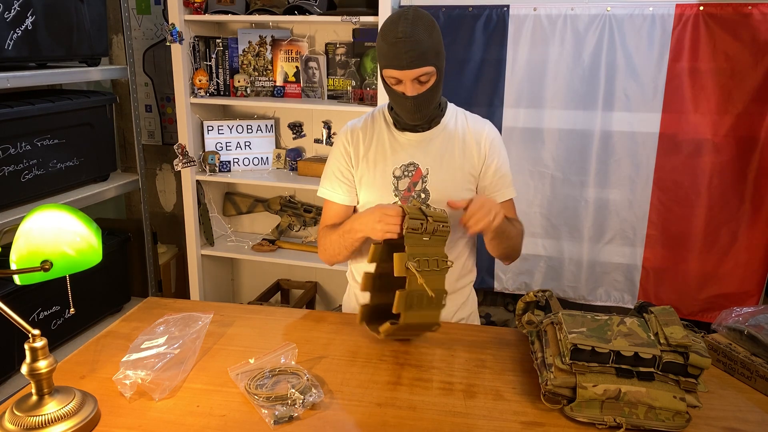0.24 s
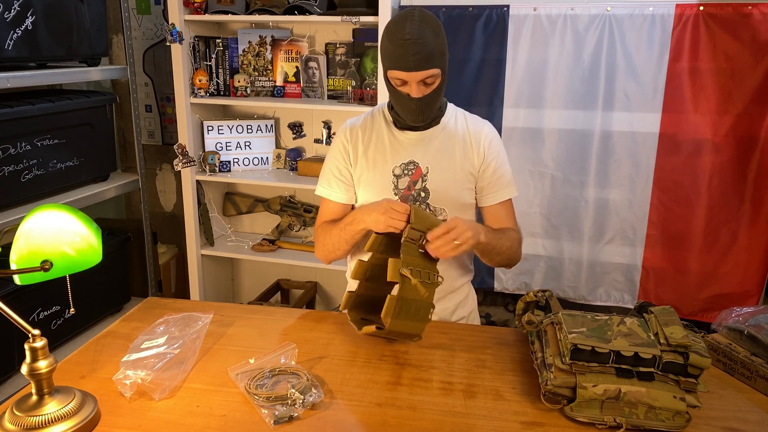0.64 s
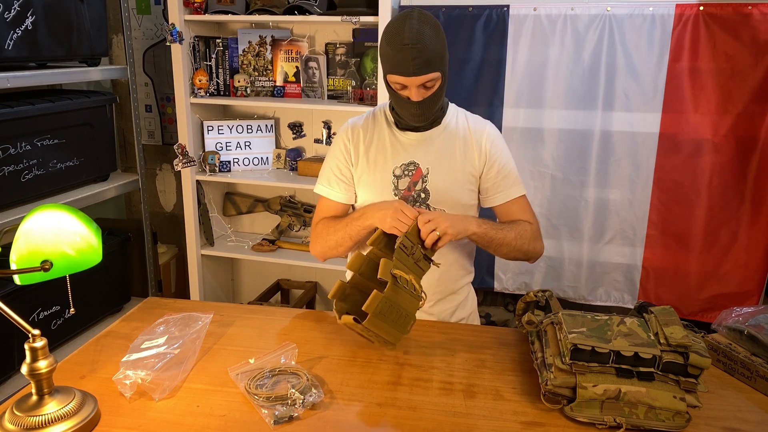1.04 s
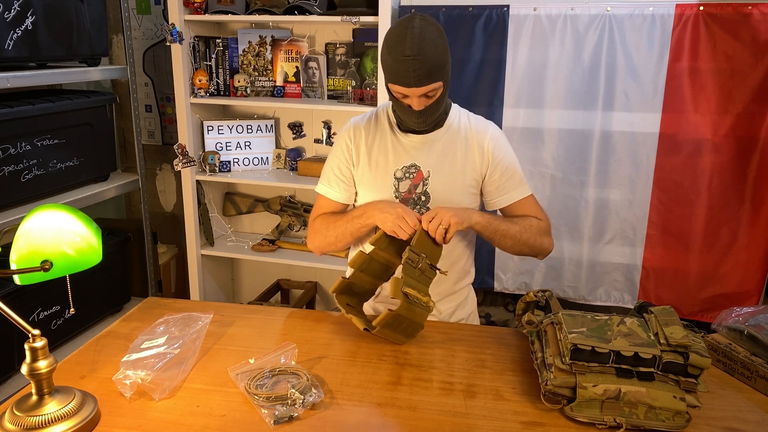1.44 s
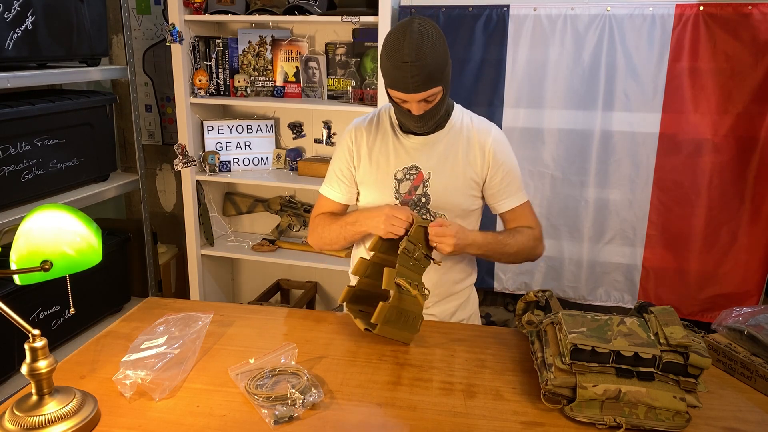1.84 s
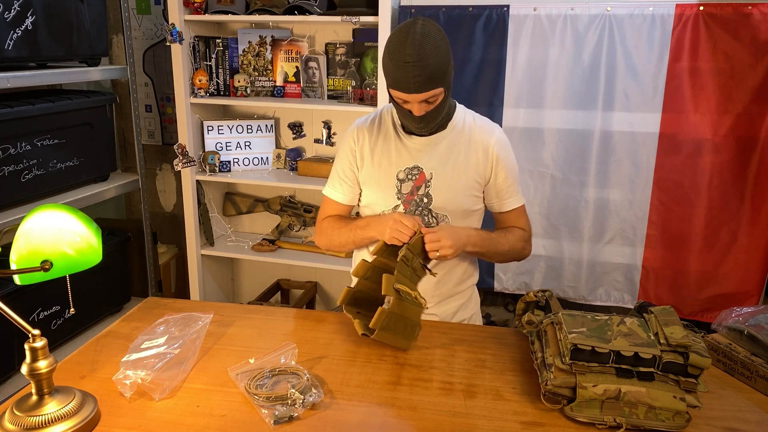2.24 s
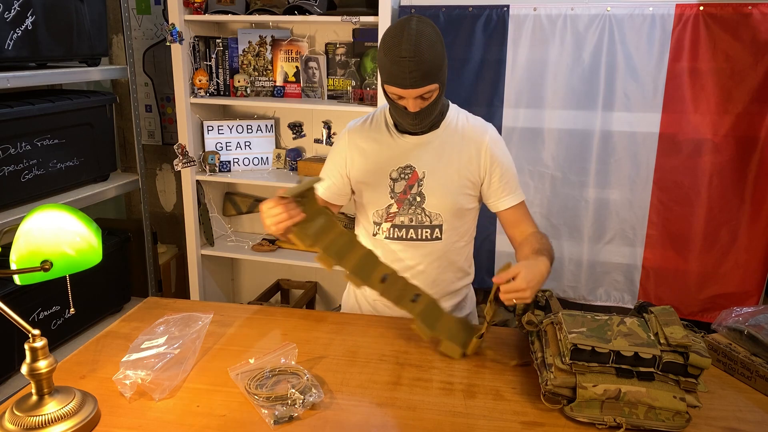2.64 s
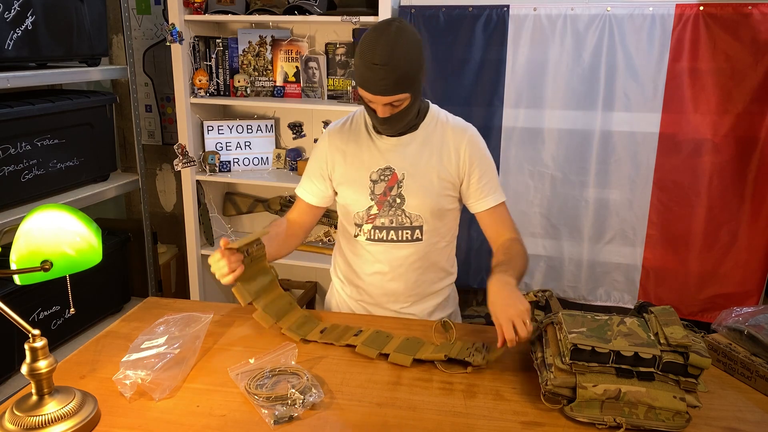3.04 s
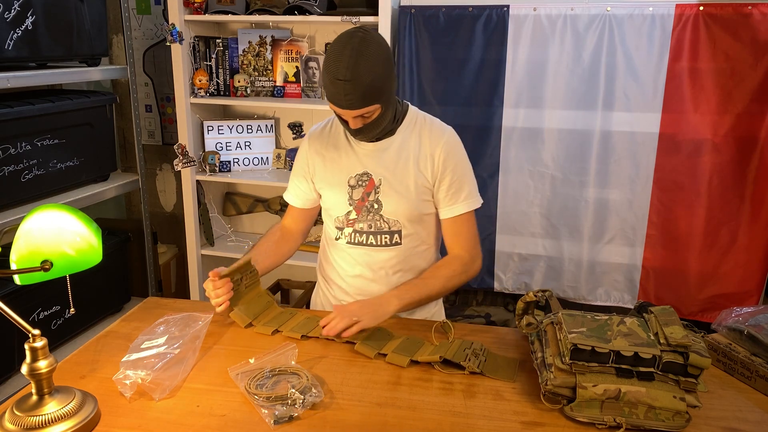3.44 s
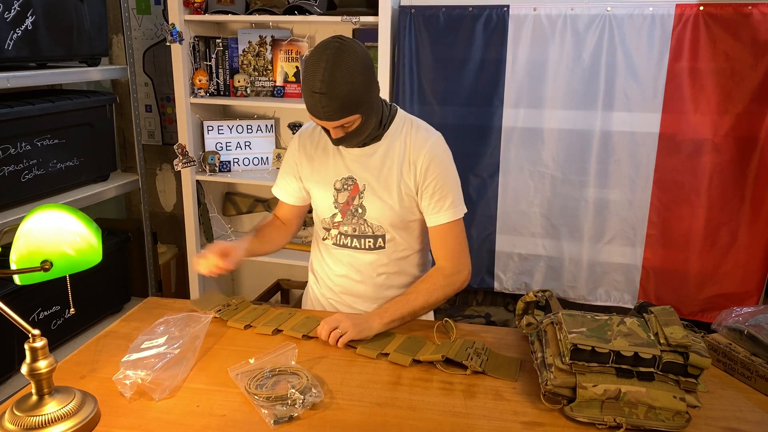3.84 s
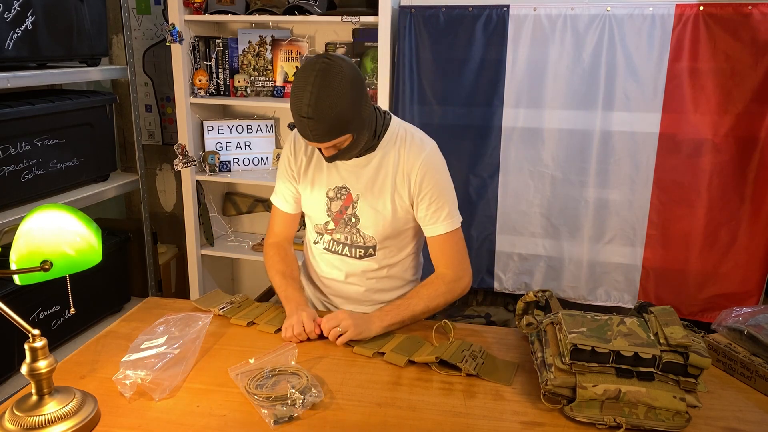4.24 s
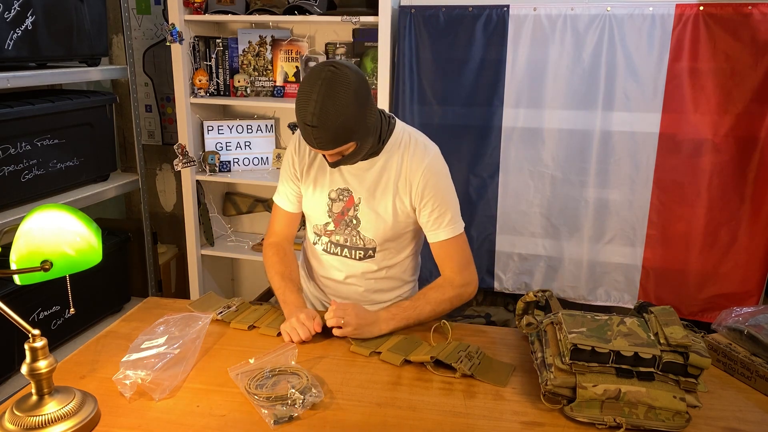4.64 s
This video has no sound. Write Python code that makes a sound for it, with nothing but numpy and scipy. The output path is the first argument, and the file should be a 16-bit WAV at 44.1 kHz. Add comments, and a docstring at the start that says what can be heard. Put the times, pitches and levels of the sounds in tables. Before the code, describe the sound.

Close in a small, fairly dry room, nylon webbing rustles with tiny fibre ticks and faint taps. A crackling hook-and-loop tear builds, and a louder, sharp rip follows within a second. The belt then lands on a wooden table with hollow knocks, one very strong, and low booms. More rubbing and knuckle taps end with a softer, longer rip.

```python
"""Hook-and-loop strips pulled apart

Strips on a nylon belt are ripped apart by hand over a wooden table in a small room. Random clicks stand for
hooks letting go, sparse as a pull starts and dense at full pull, and each click plays a short noise burst.
Between rips, finer clicks make the nylon rustle in the fingers, and fading sine waves make the belt and
knuckles knock on the table. Low noise makes the table top boom; noise echoes make the room."""
import sys
import numpy as np
from scipy import signal
from scipy.fft import rfft, irfft
from scipy.io import wavfile

SR = 44100
rng = np.random.default_rng(int(sys.argv[2]) if len(sys.argv) > 2 else 0)


def wrap_up_sound(samples):
    """Save the sound to the file named by the first command line argument, as 16-bit audio."""
    columns = np.atleast_2d(samples).T
    # keep every value between -1 and 1, then stretch to whole-number steps
    tamed = np.clip(columns, -1, 1)
    steps = np.round(tamed * 32767).astype(np.int16)
    wavfile.write(sys.argv[1], SR, steps)


N = 210529   # length in samples

# Belt and knuckles hitting the table. Each row: start in seconds, blow level in dB before a shared trim,
# pitch in Hz of the hollow under the belt (table modes fade away from it), crack level in dB against the
# blow before a trim, hollow level in dB against the table modes, boom level in dB before a trim.
KNOCKS = [(0.356, -36.5, 400, 3, 9, -70), (0.418, -33.5, 530, 3.5, 1, -51),
          (0.719, -29, 749, -26, 9.5, -51), (0.807, -48, 990, -3, 1, -51), (0.834, -43, 995, -20, 8, -67),
          (1.177, -34, 1990, -7, -2, -58), (2.593, -21.5, 706, -2, -7, -55),
          (2.66, -27.5, 332, 0, -16, -66), (2.928, -36, 790, 0, 4, -38.5),
          (2.956, -27.5, 1310, 3, -13, -52), (3.064, -29, 320, -8, -12, -30),
          (3.084, -17, 406, -3.5, -11, -35), (3.14, -23, 428, -13.5, -1.5, -37.5),
          (3.616, -26, 320, -2.5, -23, -29), (3.677, -1, 894, -2, -3.5, -22),
          (3.85, -27.5, 897, -12, 7.5, -52), (3.925, -27.5, 1856, 12.5, 7, -38),
          (4.019, -8.5, 306, -13, -9, -24), (4.129, -25.5, 316, -5, -6, -55),
          (4.184, -19.5, 905, -38, -1, -22), (4.355, -30.5, 1690, 11.5, 5, -46),
          (4.491, -23, 1696, 12.5, -4, -33), (4.561, -17, 1100, 3, -9, -33), (4.678, -25, 1585, 6, 35, -42)]
# Sound colour of a hook letting go. Each row: frequency in Hz, level in dB per Hz.
HOOK_COLOUR = [(940, -42), (1600, -3.5), (1730, -21), (1960, -19.5), (2130, -2.5), (2480, -15),
               (3090, -2.5), (4490, -1), (5430, -1.5), (6960, -3), (8760, 0), (9820, -7.5), (12500, -8),
               (13500, -5), (15700, -8.5)]


def from_db(db):
    """Turn decibels into a gain."""
    return 10 ** (np.asarray(db) / 20)


def rms_one(x):
    """Scale to an rms of 1 along the last axis."""
    return x / np.sqrt(np.mean(x ** 2, axis=-1, keepdims=True) + 1e-20)


def in_time(rows):
    """Draw straight lines between the rows of a table, giving each column at every sample."""
    start_s, *columns = np.transpose(rows)
    return [np.interp(np.arange(N) / SR, start_s, column) for column in columns]


def hump_db(hz, centre_hz, octaves):
    """A broad rise around a pitch, 6 dB down at the given number of octaves away."""
    return -6.0 * (np.log2(hz / centre_hz) / octaves) ** 2


def coloured(spectrum, shape, lift_db=0):
    """Noise shaped to a spectrum, very weak outside it, with an rms of 1."""
    hz = np.fft.rfftfreq(shape[-1], 1 / SR) + 1   # the 1 avoids log(0)
    table = np.array(spectrum)
    level_db = np.interp(np.log(hz), np.log(table[:, 0]), table[:, 1], left=-90, right=-90)
    noise = rfft(rng.standard_normal(shape))
    return rms_one(irfft(noise * from_db(level_db + lift_db), shape[-1]))


def bursts(spectrum, t60_s, pitches_hz, octaves):
    """Fading noise bursts of energy 1, one per pitch, with the bass under the spectrum filtered out."""
    age = np.arange(2048) / SR
    hz = np.fft.rfftfreq(2048, 1 / SR) + 1
    lift_db = np.maximum(hump_db(hz, np.array(pitches_hz)[:, None], octaves), -14.0)
    shapes = coloured(spectrum, (len(pitches_hz), 2048), lift_db) * from_db(-60 * age / t60_s)
    bass_cut = signal.butter(3, spectrum[1][0], "high", fs=SR, output="sos")
    shapes = signal.sosfilt(bass_cut, shapes)
    return shapes / np.sqrt(np.sum(shapes ** 2, axis=1, keepdims=True))


def shower(per_s, spread_db):
    """Random clicks of uneven size, with an average power near 1 whatever the rate."""
    per_s = np.clip(per_s, 30, SR / 2)
    sizes = from_db(spread_db * np.minimum(rng.exponential(1, N), 4))
    sizes = sizes / np.sqrt(np.mean(sizes ** 2))
    happens = rng.random(N) < per_s / SR
    return sizes * happens * np.sqrt(SR / per_s)


def dealt(clicks, spectrum, t60_s, pitch_hz, low_hz, high_hz, scatter, octaves):
    """Every click plays one of 20 bursts, its pitch scattered in octaves around the pitch of the moment."""
    bank_hz = np.geomspace(low_hz, high_hz, num=20)
    octave = np.log2(pitch_hz) + rng.normal(0, scatter, N)
    choice = np.round(np.interp(octave, np.log2(bank_hz), np.arange(len(bank_hz))))
    length = round(t60_s * SR)
    out = np.zeros(N)
    for k, shape in enumerate(bursts(spectrum, t60_s, bank_hz, octaves)):
        out += signal.oaconvolve(clicks * (choice == k), shape[:length])[:N]
    return out


def drift(rate):
    """Random wandering: straight lines between chance values of spread 1, rate of them per second."""
    knots = rng.standard_normal(int(N / SR * 200) + 2)
    return np.interp(np.arange(N) / SR * rate, np.arange(len(knots)), knots)


def still_air():
    """Steady soft noise of the air, plus a very low, slow pressure sway."""
    # Colour of the air noise, then of the sway. Each row: frequency in Hz, level in dB.
    air_colour = [(59, -39), (100, -3.5), (288, -2), (630, 0), (762, -3), (2150, -7), (11700, -23),
                  (15700, -25)]
    sway_colour = [(1, 0.5), (3, 1), (10, -29), (22, -30.5)]
    return from_db(-62) * coloured(air_colour, (N,)) + from_db(-50) * coloured(sway_colour, (N,))


def boom():
    """Low noise: the table top swells and dies after each knock, over a rumble that never stops."""
    # Rumble under the booms. Each row: time in seconds, level in dB.
    rumble = [(0.0, -62), (0.7, -72.5), (1.9, -57), (2.6, -56.5), (2.9, -63), (4.2, -54), (4.4, -36),
              (4.77, -40.5)]
    # Colour of boom and rumble. Each row: frequency in Hz, level in dB per Hz.
    boom_colour = [(22, -22), (33, -3), (42, 0), (55, -3), (75, -12), (115, -13), (150, -40)]
    rise_s, t60_s = 0.031, 0.42
    t = np.arange(N) / SR
    power = from_db(in_time(rumble)[0]) ** 2
    for start_s, *_, boom_db in KNOCKS:
        age = np.maximum(t - start_s, 0)
        swell = 1 - np.exp(-age / rise_s)
        power = power + (swell * from_db(boom_db + 1.5 - 60 * age / t60_s)) ** 2
    return np.sqrt(power) * coloured(boom_colour, (N,))


def handling():
    """Nylon slides on nylon and skin: fine fibre ticks, bright and dull, whose pitch wanders with the grip."""
    # The course of the grip. Each row: time in seconds, bright rustle level in dB before a trim, its pitch
    # in Hz, dull rub level in dB before a trim, its pitch in Hz.
    grip = [(0.0, -42.5, 5500, -45.5, 750), (0.15, -50.5, 5100, -54.5, 1110),
            (0.238, -54.5, 8000, -71, 1250), (0.29, -51, 8150, -80, 1200), (0.325, -54, 6840, -75, 556),
            (0.366, -47.5, 4210, -52.5, 522), (0.49, -45.5, 4660, -51.5, 980),
            (0.65, -45.5, 6290, -58, 800), (0.8, -46, 5410, -54.5, 1037), (1.02, -46.5, 5160, -52.5, 1068),
            (1.132, -51.5, 5150, -58, 1220), (1.18, -40, 6050, -43.5, 1476),
            (1.326, -49.5, 4830, -49, 1038), (1.5, -43, 7470, -45.5, 1150), (1.59, -52, 4900, -54, 1288),
            (1.94, -48, 5400, -48, 1316), (2.04, -49, 5160, -52.5, 990), (2.18, -42, 5370, -44, 1213),
            (2.47, -41, 5300, -48, 1014), (2.66, -56.5, 4750, -47, 497), (2.79, -44.5, 6060, -49, 892),
            (2.858, -44.5, 4430, -54.5, 1053), (2.905, -54.5, 5400, -59, 803),
            (3.017, -43, 8040, -49, 1070), (3.17, -63, 5600, -46, 470), (3.26, -63.5, 5460, -84.5, 442),
            (3.44, -61.5, 5650, -80, 713), (3.512, -41, 5180, -50.5, 1110), (3.64, -45, 4200, -45.5, 1130),
            (3.78, -49.5, 3740, -41, 379), (3.81, -59.5, 3760, -66, 360), (3.915, -43, 5570, -50, 870),
            (3.99, -59, 5900, -61, 1450), (4.02, -41, 4860, -50, 385), (4.12, -51, 4120, -38, 400),
            (4.19, -46.5, 3880, -34, 603), (4.28, -53, 5750, -51.5, 709), (4.4, -45.5, 5640, -45.5, 1337)]
    # Colours of the bright and the dull ticks. Each row: frequency in Hz, level in dB per Hz.
    rustle_colour = [(880, -61), (1500, -26), (2290, 3.5), (2650, 7.5), (3890, 0.5), (5220, -1.5),
                     (8530, 1), (9980, -4.5), (13500, -2), (15700, -8)]
    rub_colour = [(53, -43), (90, -52), (211, 11), (385, 3.5), (452, 8), (969, -0.5), (1420, 2.5),
                  (1640, 6.5), (3000, -6), (3900, -72.5), (6600, -120)]
    bright_db, bright_hz, dull_db, dull_hz = in_time(grip)
    bright = shower(2300.0, spread_db=0.5) * from_db(bright_db - 3.0 + 2.3 * drift(37))
    dull = shower(1500.0, spread_db=3.0) * from_db(dull_db - 3.5 + 0.7 * drift(34))
    stray = shower(35.0, spread_db=3.5) * from_db(bright_db - 8)   # faint hook snaps at random
    rustle = dealt(bright, rustle_colour, 0.0045, bright_hz, 2200, 14000, scatter=0.37, octaves=1.0)
    stray_snaps = dealt(stray, HOOK_COLOUR, 0.0061, bright_hz, 2500, 12000, scatter=0.69, octaves=1.0)
    rub = dealt(dull, rub_colour, 0.021, dull_hz, 200, 2500, scatter=0.27, octaves=0.62)
    return rustle + stray_snaps + rub


def knocks():
    """Each blow rings the table modes and the hollow under the belt, damped by the hand, plus a crack."""
    # Ringing modes of the table. Each row: frequency in Hz, level in dB, own 60 dB fade time in seconds
    # (held between 0.03 and 0.3 below).
    table_modes = [(123.6, -9.5, 0.23), (192.5, -6.5, 0.3), (291.2, -5.5, 5.0), (387, -6.5, 0.16),
                   (459, -15, 0.5), (621, -10, 0.1), (808, -17.5, 0.38), (894, -7.5, 0.062),
                   (1013, -17, 0.63), (1153, -14, 0.18), (1415, -32, 0.18), (1325, -13.5, 0.074),
                   (1600, -35, 0.68), (1695, -16.5, 0.14), (1710, -41, 0.42), (2027, -17.5, 0.31),
                   (2150, -26, 0.39), (2160, -41, 0.14), (2350, -44, 0.14), (2420, -33, 0.54)]
    # Colour of the crack. Each row: frequency in Hz, level in dB per Hz.
    crack_colour = [(250, -36), (500, 6), (1500, 12.5), (4000, -1.5), (12000, -13)]
    faint_damp_s, full_damp_s = 0.06, 0.15   # the hand damps faint blows faster than full ones
    age = np.arange(SR // 3) / SR
    out = np.zeros(N + len(age))
    hz, level_db, t60_s = np.transpose(table_modes)[:, :, None]
    chance_db = rng.normal(0, 2, (len(KNOCKS), len(table_modes), 1))
    phases = rng.uniform(0, 2 * np.pi, chance_db.shape)
    cracks = bursts(crack_colour, 0.05, np.array(KNOCKS)[:, 2], octaves=8.6)
    contact = 1 - np.exp(-(age / 0.0013) ** 2)   # the soft contact builds up over a few milliseconds
    late = round(.0025 * SR)   # the crack follows the start of contact
    for row, own_db, phase, crack in zip(KNOCKS, chance_db, phases, cracks):
        start_s, peak_db, hollow_hz, crack_db, hollow_db, _ = row
        damp_s = faint_damp_s + (full_damp_s - faint_damp_s) * from_db(peak_db / 2)
        # Higher modes are damped faster by the hand.
        fade_per_s = 1 / np.clip(t60_s, .03, .3) + (hz / 600) ** 0.26 / damp_s
        octaves = np.where(hz < hollow_hz, 3.1, 2.12)   # modes weaken more steeply above the hollow
        mode_db = level_db + own_db + hump_db(hz, hollow_hz, octaves) - 60 * age * fade_per_s
        modes = np.sum(from_db(mode_db) * np.sin(2 * np.pi * hz * age + phase), axis=0)
        hollow = from_db(hollow_db - 60 * age / 0.072) * np.sin(2 * np.pi * hollow_hz * age)
        blow = contact * (hollow + modes)
        blow = blow / np.abs(blow).max()
        blow[late:late + len(crack)] += from_db(crack_db - 2.5) * crack / np.abs(crack).max()
        at = round(start_s * SR)
        out[at:at + len(age)] += from_db(peak_db - 4.5) * blow
    return out[:N]


def snaps():
    """A lone hook or fibre lets go: a noise burst a few milliseconds long around its own pitch."""
    # Each row: start in seconds, peak level in dB before a shared trim, pitch in Hz.
    lone_hooks = [(0.0453, -26, 8790), (0.163, -17, 6540), (0.169, -15, 6900), (0.2727, -18, 8650),
                  (0.2907, -20, 8240), (0.36, -23, 4140), (0.598, -24, 8600), (0.628, -23, 8500),
                  (0.748, -24, 8860), (0.769, -12, 6200), (0.959, -28, 3640), (1.035, -23, 6600),
                  (1.0654, -23, 4130), (1.1711, -28, 3570), (1.2455, -23, 3650), (1.3353, -22, 4800),
                  (1.4293, -29, 4850), (1.4594, -12.5, 5000), (1.486, -20.5, 4500), (1.5226, -13.5, 8900),
                  (1.553, -22.5, 8630), (1.5989, -16, 4630), (1.602, -14.5, 5000), (1.6315, -13, 5040),
                  (1.6577, -31, 4340), (1.6634, -15, 7360), (1.6836, -12, 4800), (1.696, -10, 8300),
                  (1.707, -8, 5100), (1.727, -3, 8100), (2.15, -22.5, 4740), (2.188, -9, 8700),
                  (2.1977, -7, 7400), (2.2104, -7.5, 5930), (2.217, -3, 7840), (2.243, -11, 4000),
                  (2.7605, -25, 8800), (2.85, -21, 4100), (2.9183, -27, 12800), (3.019, -24, 8520),
                  (3.0898, -27.5, 3180), (3.193, -28.5, 5410), (3.3148, -31.5, 11450),
                  (3.4177, -27.5, 5570), (3.4264, -31, 7200), (3.6782, -15.5, 3080), (3.9284, -14, 5250),
                  (4.274, -25, 8240), (4.393, -18, 6400), (4.4022, -15.5, 5840), (4.4748, -16.5, 7540),
                  (4.479, -16, 3220), (4.518, -16, 5690), (4.5303, -2, 6740), (4.625, -12, 6100),
                  (4.6955, -11, 6190)]
    out = np.zeros(N + 2048)
    shapes = bursts(HOOK_COLOUR, 0.0071, np.array(lone_hooks)[:, 2], octaves=0.58)
    for (start_s, peak_db, _), snap in zip(lone_hooks, shapes):
        at = round(start_s * SR)
        out[at:at + 2048] += from_db(peak_db - 4.5) * snap / np.abs(snap).max()
    return out[:N]


def pull():
    """The course of every rip: a weak pull frees fewer hooks, more softly, and shakes the webbing less."""
    # Each row: start in seconds, rise, hold and fall in seconds, hooks in dB at full pull before a trim,
    # webbing in dB against the hooks at full pull halfway along, hook pitch in Hz at full pull, webbing
    # pitch in Hz at the start and at the end, lift of the top in dB halfway along.
    rip_rows = [(0.146, 0.021, .004, 0.027, -33.5, -6, 6360, 832, 886, -3),
                (0.718, 0.051, 0.0058, 0.0085, -32, -15, 5870, 690, 785, 0),
                (1.653, 0.13, 0.072, .035, -15, -16.5, 4306, 1293, 897, 2),
                (2.24, .055, .085, .022, -6, -11.5, 4215, 1102, 479, 4),
                (2.544, 0.0034, .004, 0.052, -29.5, -11, 5130, 920, 690, 4),
                (4.382, .018, 0.0047, 0.018, -34.5, -5, 5400, 1216, 1150, 2),
                (4.475, 0.051, 0.25, 0.086, -22.5, -6.5, 5530, 1210, 998, -3)]
    swell_db, sink_db = 17.5, 17.5   # how far under full pull a rip starts and ends
    weak_per_s, full_per_s = 230, 1900   # hooks let go per second
    t = np.arange(N) / SR
    # Between rips the hooks are silent.
    out = np.tile([[-200.], [0], [5000], [1000], [0], [1000]], N)
    for start_s, rise_s, hold_s, fall_s, peak_db, webbing_db, hook_hz, start_hz, end_hz, top_db in rip_rows:
        age = t - start_s
        along = age / (rise_s + hold_s + fall_s)   # 0 at the start of the rip, 1 at its end
        weak = np.clip(1 - age / rise_s, 0, 1) ** 1.34
        letting_go = np.clip((age - rise_s - hold_s) / fall_s, 0, 1) ** 0.91
        course = [
            peak_db - swell_db * weak - sink_db * letting_go,
            webbing_db + 3.5 * (along - .5) - 5.5 * (weak + letting_go),   # the webbing grows along a rip
            hook_hz * 2 ** (0.13 * weak),   # the hooks sound higher while the starting pull is weak
            start_hz + (end_hz - start_hz) * along,
            top_db - 2 * (along - .5),   # the top dulls along a rip
            full_per_s * (weak_per_s / full_per_s) ** weak]
        out = np.where((along > 0) & (along < 1), course, out)
    return out


def rips():
    """Showers of released hooks in clumps; each release also shakes the webbing behind the strip."""
    # Colour of the shaken webbing. Each row: frequency in Hz, level in dB per Hz.
    webbing_colour = [(130, -41), (220, -11.5), (309, -7), (361, -10.5), (587, -3), (651, -11), (1040, -8),
                      (1370, -11), (2600, -4), (3380, -35.5), (5720, -120)]
    hooks_db, webbing_db, hook_hz, webbing_hz, top_db, per_s = pull()
    clumps_db = 1.6 * drift(90) + 1.2 * drift(30)
    clicks = shower(per_s, spread_db=3) * from_db(hooks_db + clumps_db - 2.0)
    hooks = dealt(clicks, HOOK_COLOUR, 0.015, hook_hz, 2500, 14000, scatter=.7, octaves=1.78)
    top = signal.sosfilt(signal.butter(2, 9500, "high", fs=SR, output="sos"), hooks)
    shakes = clicks * from_db(webbing_db)
    webbing = dealt(shakes, webbing_colour, 0.011, webbing_hz, 250, 2000, scatter=.6, octaves=0.26)
    return hooks + (from_db(top_db) - 1) * top + webbing


def room(x):
    """Dense echoes dying away, the treble slightly faster, starting with the bounce off the table."""
    low_t60_s, treble_t60_s, first_echo_s, level_db = 0.25, 0.24, 0.004, -8
    age = np.arange(SR // 2) / SR
    noise = rng.standard_normal(len(age))
    low = signal.sosfilt(signal.butter(2, 8000, fs=SR, output="sos"), noise)
    treble = noise - low
    tail = low * from_db(-60 * age / low_t60_s) + treble * from_db(-60 * age / treble_t60_s)
    tail = tail * (age > first_echo_s)
    tail = tail / np.sqrt(np.sum(tail ** 2))
    return from_db(level_db) * signal.oaconvolve(x, tail)[:N]


def scene():
    """Add the sources on the table, their room echoes, the boom and the still air."""
    near = handling() + knocks() + snaps() + rips()
    return (still_air() + boom() + near + room(near))[None]


def record(dry):
    """Clip whatever passes full scale, then cut the top above 15750 Hz with a steep filter."""
    top_cut = signal.ellip(14, .3, 85, 15750, fs=SR, output="sos")
    return signal.sosfilt(top_cut, np.clip(dry, -1, 1))


dry = scene()
out = record(dry)
wrap_up_sound(out)
```